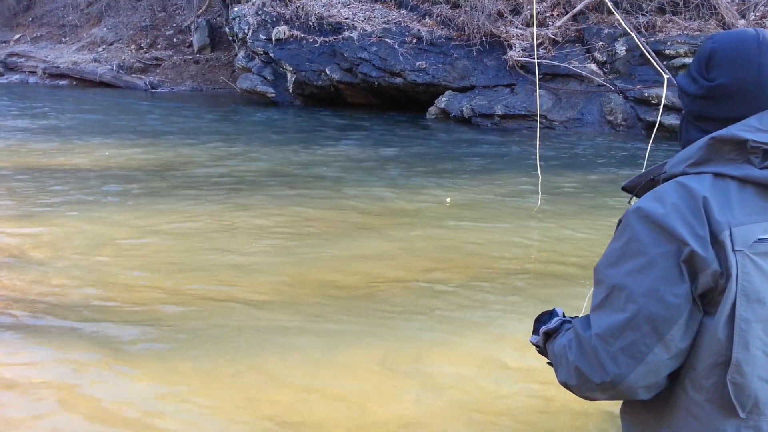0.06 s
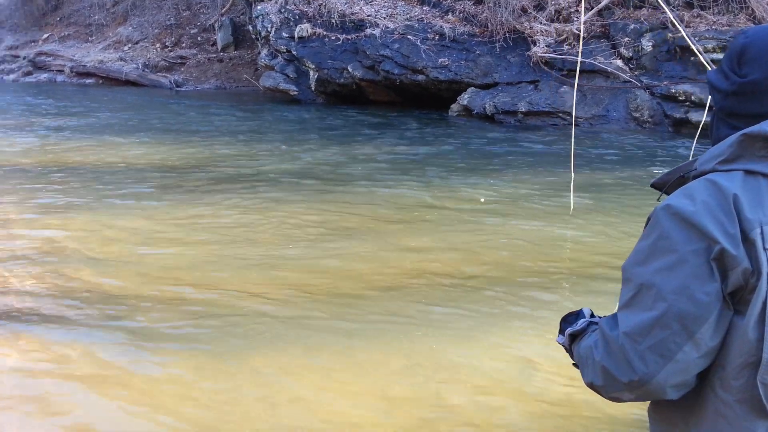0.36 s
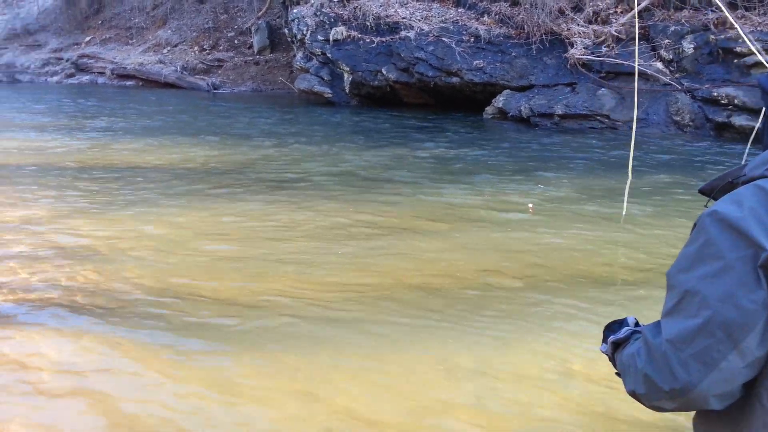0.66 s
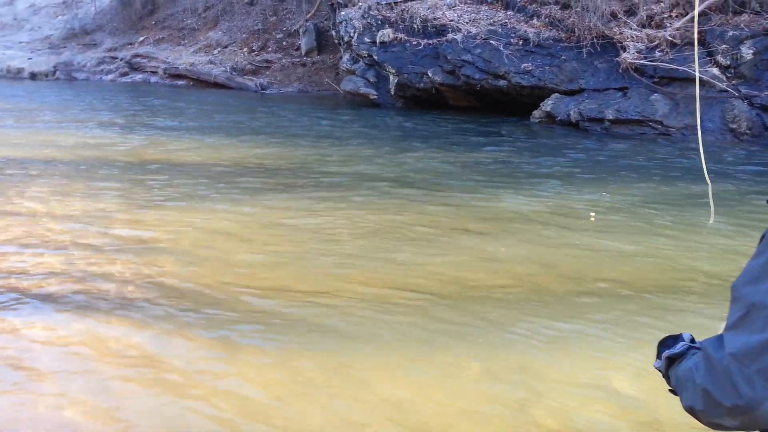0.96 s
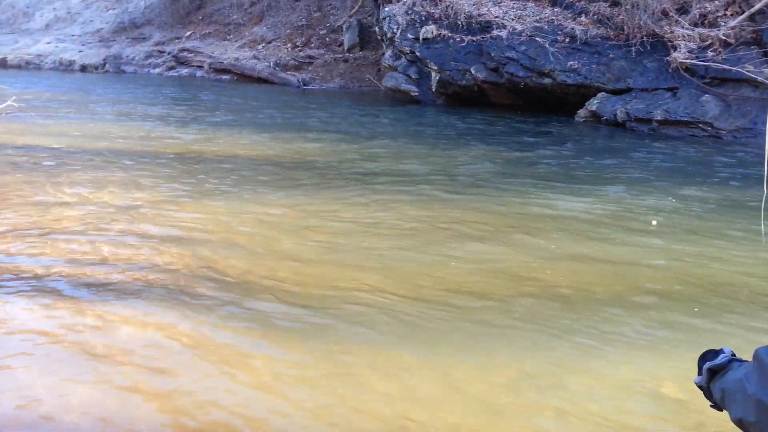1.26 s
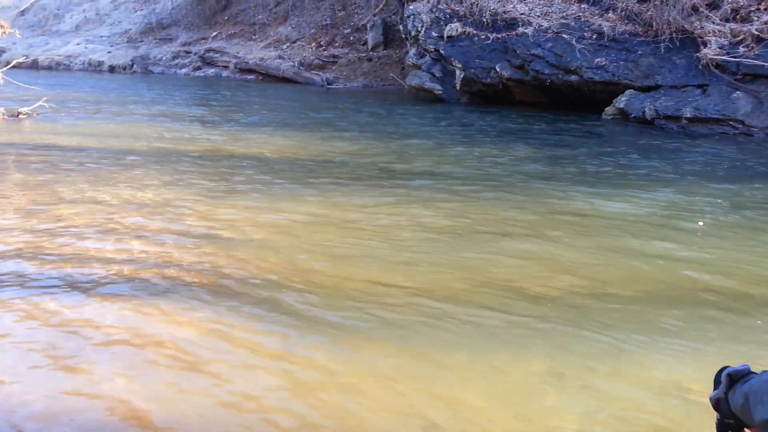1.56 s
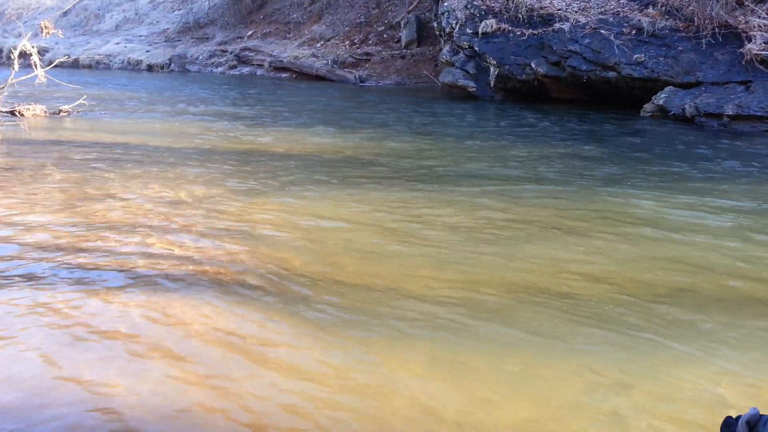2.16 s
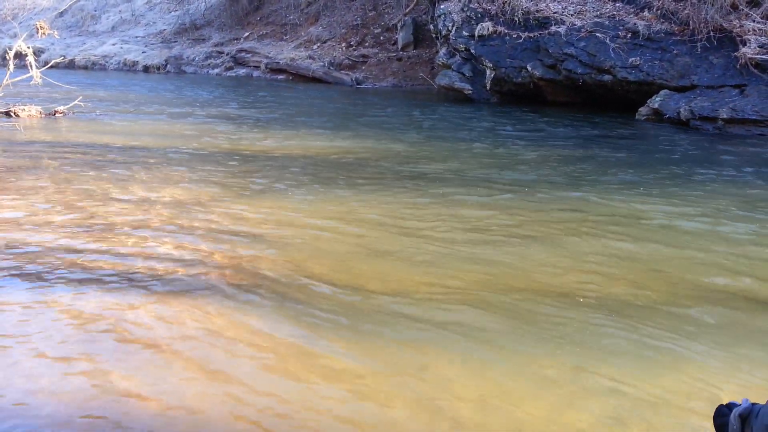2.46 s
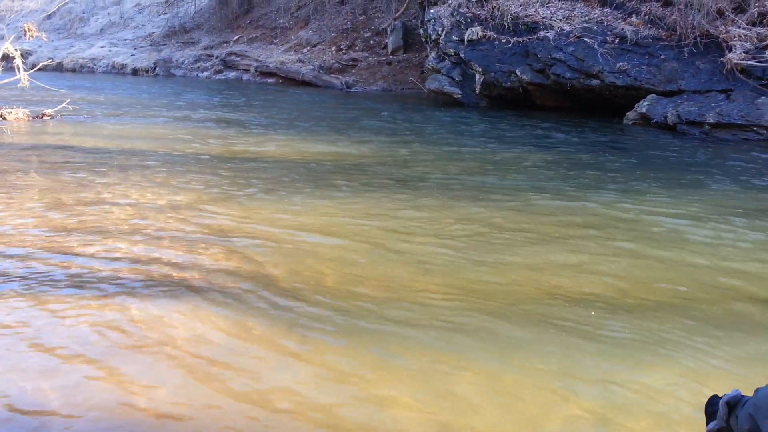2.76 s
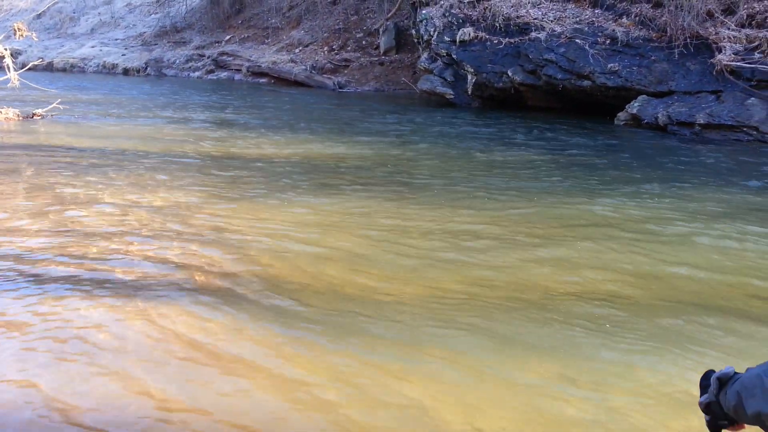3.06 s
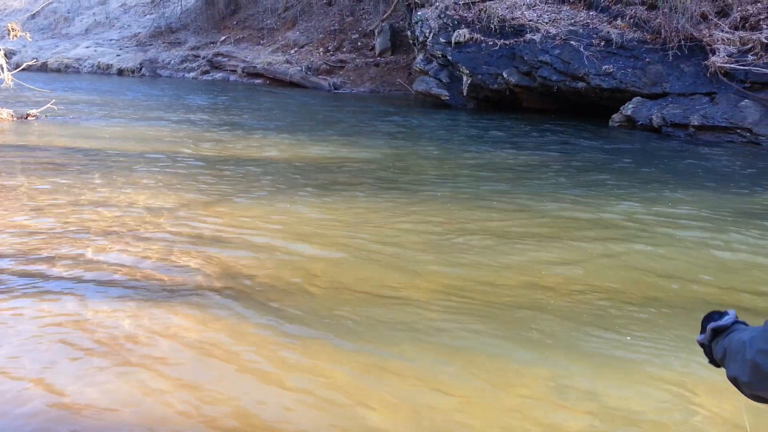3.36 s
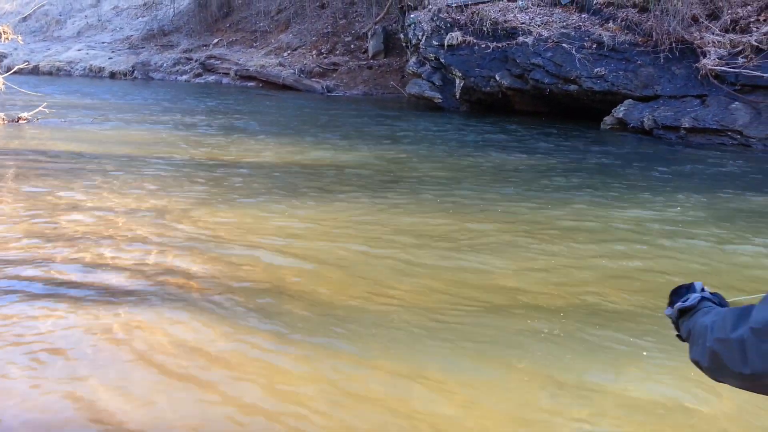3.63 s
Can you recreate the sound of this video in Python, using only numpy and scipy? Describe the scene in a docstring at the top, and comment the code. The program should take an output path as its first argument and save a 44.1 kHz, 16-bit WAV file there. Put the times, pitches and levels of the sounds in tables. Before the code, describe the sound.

Shallow stream water rushes and gurgles, with a faint low drone and sharp close clicks.

```python
"""Angler beside a shallow stream

From the bank, water rushes past, mostly on the left, and slowly grows quieter; small bubbles ring in
it and pockets of air gurgle up. A low drone, like a far engine, fades underneath, with a few soft bumps.
Close to the microphone a jacket rustles and the angler's gear ticks; both ring the two microphone ports."""
import sys
import numpy as np
from scipy import signal
from scipy.io import wavfile

SR = 44100
rng = np.random.default_rng(int(sys.argv[2]) if len(sys.argv) > 2 else 0)


def waveform_to_disk(signal):
    """Save audio, clipped to [-1, 1], as 16-bit WAV at the path in sys.argv[1]."""
    frames = np.transpose(np.atleast_2d(signal))
    scaled = np.clip(frames, -1, 1) * 32767
    samples = np.round(scaled).astype(np.int16)
    wavfile.write(sys.argv[1], SR, samples)


N = 176400
T = np.arange(N) / SR


def from_db(db):
    """Decibels to gain."""
    return 10 ** (np.asarray(db) / 20)


def unit_rms(x):
    """Scale to an rms of 1."""
    return x / np.sqrt(np.mean(x ** 2) + 1e-20)


def over_time(rows):
    """Each column of a timed curve at every sample."""
    times, *columns = np.transpose(rows)
    return [np.interp(T, times, column) for column in columns]


def at_hz(points, hz):
    """Read a curve on a log-frequency axis."""
    freqs, values = np.transpose(points)
    return np.interp(np.log(hz), np.log(freqs), values)


def panned(db):
    """Constant-power gains, the left louder than the right by db."""
    return unit_rms(from_db(np.array([[db], [-db]]) / 2))


def delayed(x, lag_s):
    """The same sound arriving later."""
    return np.interp(T - lag_s, T, x)


def drift(rate_hz):
    """Smooth random wander of rms about 1, mostly slower than rate_hz."""
    step, settle = 40, 2000  # samples per point; points of run-in
    pole = np.exp(-2 * np.pi * rate_hz * step / SR)
    white = rng.standard_normal(N // step + settle + 2)
    slow = signal.lfilter([1], [1, -2 * pole, pole * pole], white)[settle:]
    return np.interp(np.arange(N) / step, np.arange(len(slow)), unit_rms(slow))


def resonance(x, hz, width_hz):
    """Two-pole band-pass with a peak gain of 1."""
    pole = np.exp(-np.pi * width_hz / SR)
    feedback = [1, -2 * pole * np.cos(2 * np.pi * hz / SR), pole * pole]
    return signal.lfilter(np.array([1, 0, -1]) * (1 - pole * pole) / 2, feedback, x + 1e-18)


def ring(clicks, hz, t60):
    """Each click starts a sine that falls 60 dB in t60 seconds."""
    pole, angle = from_db(-60 / (t60 * SR)), 2 * np.pi * hz / SR
    return signal.lfilter([0, np.sin(angle)], [1, -2 * pole * np.cos(angle), pole * pole], clicks + 1e-18)


def grains(per_s, spread_db):
    """Random clicks of uneven size and sign."""
    sizes = from_db(spread_db * np.minimum(rng.exponential(1, N), 5)) * rng.choice([-1, 1], N)
    return sizes * (rng.random(N) < per_s / SR)


def swells(rows):
    """Bell-shaped swells that add in power."""
    return np.sqrt(sum(from_db(db) ** 2 * np.exp(-((T - at) / half) ** 2) for at, half, db in rows))


def snap(clicks):
    """The bright, dry sound of a tiny contact."""
    lowpass = signal.butter(4, 11600, fs=SR, output="sos")
    return signal.sosfilt(lowpass, resonance(clicks, hz=5360, width_hz=4400))


WATER_LAG_S, RUMBLE_LAG_S = 0.00038, 0.00047  # the right port hears these later than the left

# Noise reaching the microphone by the direct path (frequency [Hz], share of power [0-1])
DIRECT_SHARE = [(100, 0.72), (300, 1), (550, 0.64), (900, 0.63), (1250, 0.47), (1700, 0.08), (3000, 0.08),
                (6000, 0.02)]
def banded_noise(spectrum, lag_s, flicker_db, flicker_hz):
    """Flickering third-octave noise: a direct part, lag_s later on the right, and a diffuse part."""
    out, edges = 0, 22 * 2 ** (np.arange(30) / 3)
    white = rng.standard_normal((2, 3, N))
    for k, (low, high) in enumerate(zip(edges, edges[1:])):
        hz = np.sqrt(low * high)
        if spectrum[0][0] / 2 < hz < spectrum[-1][0] * 2:
            bandpass = signal.butter(2, [low, high], "band", fs=SR, output="sos")
            band = signal.sosfilt(bandpass, white[k % 2])
            direct, diffuse = np.array([band[0], delayed(band[0], lag_s)]), band[1:]
            share = np.clip(at_hz(DIRECT_SHARE, hz), 0, .99)
            pair = np.sqrt(share) * direct + np.sqrt(1 - share) * diffuse
            out += pair * from_db(at_hz(spectrum, hz) + flicker_db * drift(flicker_hz))
    return unit_rms(out)


# Low note in the distance (time [s], pitch [Hz], relative level [dB])
DRONE_NOTE = [(0, 84.2, -47), (.3, 84.55, -47), (.72, 87.8, -50.5), (1.0, 83.9, -44.5), (1.3, 87.1, -60),
              (2.2, 89, -59), (3.1, 90, -73), (4, 89, -64)]
# Rumble around it (time [s], relative level [dB])
RUMBLE_FADE = [(0, -48), (.25, -45.5), (.55, -50), (.7, -49.5), (1.3, -50.5), (1.75, -48), (1.98, -57),
               (2.12, -49), (2.5, -55.5), (2.85, -56), (3.1, -53), (3.35, -59.5), (3.65, -57.5),
               (3.85, -58.5), (4, -55.5)]
# Colour of the rumble (frequency [Hz], relative density [dB])
RUMBLE_SPECTRUM = [(25, -33), (40, -23), (55, -7.5), (85, -1.5), (120, 0), (170, -0.5), (230, -10.5),
                   (400, -30.5), (900, -57)]
def far_drone():
    """A wavering, throbbing note in a bed of rumble, like an engine far off."""
    hz, note_db = over_time(DRONE_NOTE)
    wavering_hz = hz + 2.35 * drift(9.7)
    note = np.sqrt(2) * np.sin(2 * np.pi * np.cumsum(wavering_hz) / SR)
    note *= from_db(note_db - 0.5 + 2.5 * drift(7.4))
    rumble_db, = over_time(RUMBLE_FADE)
    rumble = banded_noise(RUMBLE_SPECTRUM, RUMBLE_LAG_S, flicker_db=1, flicker_hz=8.8)
    return from_db(rumble_db + 1) * rumble + np.array([note, delayed(note, RUMBLE_LAG_S)])


# Soft bumps under the water's sound (time [s], half length [s], pitch [Hz], level [dB])
LOW_BUMPS = [(1.363, 0.0072, 135, -41), (1.425, .005, 150, -47), (1.82, 0.0065, 141, -41.5),
             (1.917, 0.0051, 126, -37.5), (2.151, 0.0051, 169.4, -42.5), (2.411, 0.0053, 135.3, -40),
             (2.576, 0.005, 152, -42), (2.697, 0.0063, 169.2, -41.5), (3.065, 0.0051, 149.8, -39),
             (3.386, 0.0037, 146, -40), (3.736, 0.0099, 190, -48.5), (3.889, .008, 180, -47)]
def bumps():
    """Each bump swells and fades within a few cycles of a low note."""
    out = 0
    for at, half, hz, db in LOW_BUMPS:
        envelope = from_db(db) * np.exp(-.5 * ((T - at) / half) ** 2)
        out += envelope * np.sin(2 * np.pi * (hz * T + rng.random()))
    return np.array([out, delayed(out, RUMBLE_LAG_S)])


# Hiss all around the microphone (time [s], relative level [dB])
HISS_CURVE = [(0, -58.5), (.8, -60), (1.1, -60), (1.4, -59.5), (1.6, -56.5), (1.95, -61), (2.1, -56),
              (2.4, -59), (3.05, -57), (3.35, -57), (3.5, -53.5), (3.72, -58.5), (3.9, -52), (4, -59.5)]
# Its colour ahead of the ports (frequency [Hz], relative density [dB])
HISS_SPECTRUM = [(1000, 4), (2800, 1.5), (4500, 5.5), (7000, -2.5), (9000, -3), (12500, -2.5), (15000, -47)]
def hiss():
    """Fine, continuous hiss whose treble flickers."""
    level_db, = over_time(HISS_CURVE)
    noise = banded_noise(HISS_SPECTRUM, WATER_LAG_S, flicker_db=2.5, flicker_hz=9.4)
    return from_db(level_db - 5) * noise


# The jacket moving close to the microphone (time [s], half length [s], relative level [dB])
JACKET_RUSTLES = [(0.133, 0.013, -56.5), (0.23, 0.032, -56.5), (.313, 0.012, -56.5), (.8, 0.042, -59.5),
                  (1.246, 0.017, -54.5), (1.605, 0.016, -59), (1.678, .004, -54), (1.808, 0.024, -54),
                  (2.145, .008, -56), (2.247, 0.0094, -53.5), (2.58, 0.0067, -48.5), (2.61, .022, -50.5),
                  (3.238, 0.032, -57), (3.29, 0.022, -50), (3.399, 0.0096, -50.5), (3.455, .01, -54.5),
                  (3.498, 0.014, -54), (3.635, 0.019, -55.5), (3.803, 0.0072, -48.5), (3.865, 0.0087, -54),
                  (3.909, 0.01, -53), (3.97, 0.0089, -51.5)]
# Colour of rubbed cloth ahead of the ports (frequency [Hz], relative density [dB])
CLOTH_SPECTRUM = [(300, 11), (1700, 11.5), (3000, 1.5), (4800, 5), (7500, -2), (10000, -2), (12500, -5.5),
                  (15000, -21)]
def jacket():
    """Cloth rubs in short swells, with separate crackles in the friction."""
    roughness = from_db(-2.5 + 2 * drift(250))
    friction = roughness * banded_noise(CLOTH_SPECTRUM, lag_s=0, flicker_db=-0.2, flicker_hz=71)
    crackle = unit_rms(np.array([snap(grains(per_s=480, spread_db=4.5)) for _ in range(2)]))
    return swells(JACKET_RUSTLES) * (friction + from_db(-10.5) * crackle)


# The gear knocking close by (time [s], half length [s], level [dB])
GEAR_KNOCKS = [(2.157, .006, -51), (3.392, .011, -54), (3.641, 0.0077, -54.5), (3.797, 0.0053, -52)]
# Colour of a knock (frequency [Hz], relative density [dB])
KNOCK_SPECTRUM = [(200, -5), (400, 7), (900, -1), (1800, 1), (2800, -17), (4000, -30)]
def gear_knocks():
    """A brief, dull body under some of the firmer ticks."""
    return swells(GEAR_KNOCKS) * banded_noise(KNOCK_SPECTRUM, lag_s=0, flicker_db=3, flicker_hz=18)


# The gear ticking close to the microphone
# (time [s], relative snap [dB], relative ring [dB], pitch [Hz], t60 [s], left over right [dB])
GEAR_TICKS = [(.1175, -47, -53, 8200, .002, 2), (0.2225, -27, -34.5, 7150, 0.0033, 26),
              (.309, -48, -50, 5200, .004, 1), (.3195, -49, -58, 7100, 0.0037, -3),
              (.445, -51, -50, 7200, 0.0024, -2.5), (.464, -46, -45, 4100, .003, 8),
              (1.6855, -36, -35.5, 8100, 0.0054, -11), (1.6854, -44, -35, 5050, 0.0037, -0.5),
              (1.802, -49, -45.5, 4720, .002, 10), (2.1545, -32.5, -36.5, 8050, 0.001, -19),
              (2.1558, -27.5, -42.5, 1930, 0.012, 5), (2.24, -41, -49, 5560, 0.0033, 6),
              (2.5945, -35.5, -50, 8000, .002, -1), (2.606, -52, -44, 11460, .003, 4),
              (2.6255, -50, -39, 6860, 0.0041, -1), (2.8935, -52, -49, 4700, 0.0046, 7),
              (3.3857, -54, -28.5, 6680, 0.0029, -7.5), (3.6394, -9.5, -19.5, 5900, 0.0019, 27),
              (3.7934, -34.5, -45, 7010, 0.0016, 8), (3.8515, -35, -33.5, 7300, 0.003, 9)]
# Colour of the rattle after a tick (frequency [Hz], relative density [dB])
RATTLE_SPECTRUM = [(600, 8), (1700, 4.5), (3000, -2.5), (5000, 0), (7000, -5), (9500, -6.5), (15000, -15)]
def gear_ticks(max_lag_s=.0003, rattle_t60=0.095):
    """Each contact is a sharp snap with a very short ring, followed by a faint dying rattle."""
    out, rattle_envelope = np.zeros((2, N)), np.zeros(N)
    for at, snap_db, ring_db, hz, t60, pan_db in GEAR_TICKS:
        click = np.zeros(N)
        click[int(at * SR)] = 1
        ringing = resonance(ring(click, hz, t60), hz, width_hz=2700)
        near = 3.16 * from_db(snap_db) * snap(click) + 1.73 * from_db(ring_db) * ringing
        far = np.roll(near, int(max_lag_s * np.tanh(abs(pan_db) / 10) * SR))
        out += panned(pan_db) * np.array([near, far] if pan_db > 0 else [far, near])
        rattle_db = min(ring_db, -31) - 15.5  # grows with the ring, up to a ceiling
        rattle_envelope += from_db(rattle_db - 60 * np.abs(T - at) / rattle_t60) * (T >= at)
    return out + rattle_envelope * banded_noise(RATTLE_SPECTRUM, lag_s=0, flicker_db=3.5, flicker_hz=53)


# Gurgles off the bank, centred (time [s], half length [s], pitch [Hz], note [dB], churn [dB])
AIR_POCKETS = [(1.61, 0.0478, 640, -66, -53), (1.83, 0.1, 810, -60, -61.5), (2.753, 0.044, 435, -54, -55),
               (2.3, 0.035, 790, -70, -57), (3.84, 0.085, 255, -58.5, -57.5)]
def gurgles(rise_oct_per_s=1.3, wobble_oct=0.0351, churn_width_hz=230):
    """Pockets of air ring and rise in pitch as they surface, with churning around each note."""
    out = 0
    for at, half, hz, note_db, churn_db in AIR_POCKETS:
        progress = (T - at) / half
        octaves = rise_oct_per_s * half * np.tanh(progress) + wobble_oct * drift(37.5)
        note = np.sqrt(2) * np.sin(2 * np.pi * np.cumsum(hz * 2 ** octaves) / SR)
        churn = resonance(rng.standard_normal(N), hz, churn_width_hz)
        churn = unit_rms(resonance(churn, hz, churn_width_hz))
        out += np.exp(-2 * progress ** 2) * (from_db(note_db) * note + from_db(churn_db) * churn)
    return out


def bubbles(per_s=500, pitches=18, ring_cycles=6.2):
    """Small bubbles, each ringing a few cycles, spread across the stream."""
    out = 0
    for hz in np.geomspace(380, 2100, pitches):
        voice = ring(grains(per_s / pitches, spread_db=3), hz, t60=ring_cycles / hz)
        lag_s = WATER_LAG_S * rng.uniform(-0.55, 1.53)
        out += np.array([voice, delayed(voice, lag_s)])
    return unit_rms(out)


# The water as heard from the bank (time [s], relative level [dB])
FLOW_LEVEL = [(0, -47), (.28, -48), (.5, -50), (.93, -49), (1.4, -51), (1.8, -51), (2.0, -53), (2.13, -51),
              (2.35, -53.5), (2.9, -54), (3.3, -54.5), (3.6, -56), (3.85, -54), (4, -56.5)]
# Colour of its rush (frequency [Hz], relative density [dB])
RUSH_SPECTRUM = [(30, -17), (120, -1.5), (300, -0.5), (520, -1.5), (760, 1), (1100, -3), (1600, -2.5),
                 (2050, -7), (2600, -19.5), (3400, -16.5), (5000, -27.5), (7000, -30.5), (10000, -40.5),
                 (15000, -68)]
def stream():
    """Shallow water rushes by, mostly on the left; the rush and its bubbles follow one flow level."""
    flow_db, = over_time(FLOW_LEVEL)
    rush = from_db(3.62) * banded_noise(RUSH_SPECTRUM, WATER_LAG_S, flicker_db=1.5, flicker_hz=13.1)
    flow = from_db(flow_db + .5 * drift(30))
    return flow * panned(1.8) * (rush + from_db(-12) * bubbles())


def scene():
    """On the bank: the water, the far drone behind it and the angler close by."""
    water = stream() + gurgles()
    background = far_drone() + bumps() + hiss()
    angler = jacket() + gear_ticks() + gear_knocks()
    return water + background + angler


# Resonances of the microphone ports (frequency [Hz], width [Hz], left gain [dB], right gain [dB])
PORT_RESONANCES = [(6170, 1530, 6.5, -2.5), (7160, 1050, -3, 12.5), (4740, 960, 2.5, -3.5),
                   (12100, 700, 2.5, 5)]
def record(dry):
    """Each of the two microphone ports colours the treble in its own way; the top is cut at 14.7 kHz."""
    coloured = dry
    for hz, width_hz, left_db, right_db in PORT_RESONANCES:
        gains = from_db([[left_db], [right_db]])
        coloured = coloured + (gains - 1) * resonance(coloured, hz, width_hz)
    lowpass = signal.ellip(10, .2, 70, 14700, fs=SR, output="sos")
    return signal.sosfilt(lowpass, coloured)


dry = scene()
out = record(dry)
waveform_to_disk(out)
```